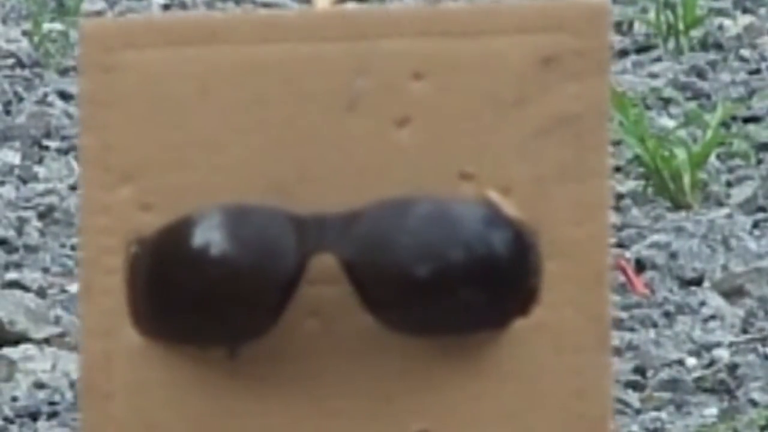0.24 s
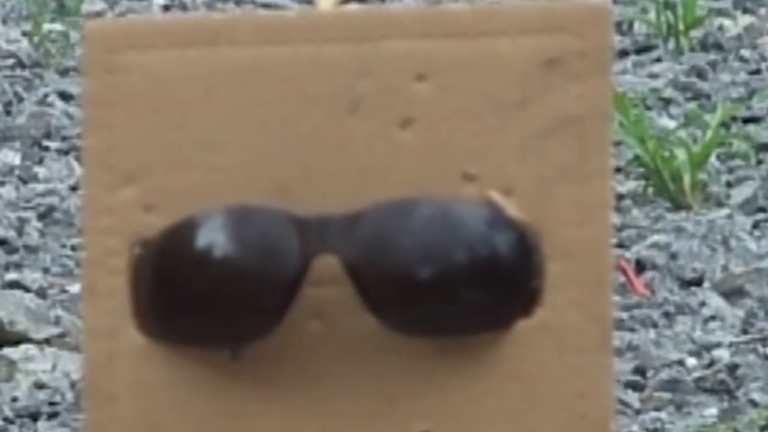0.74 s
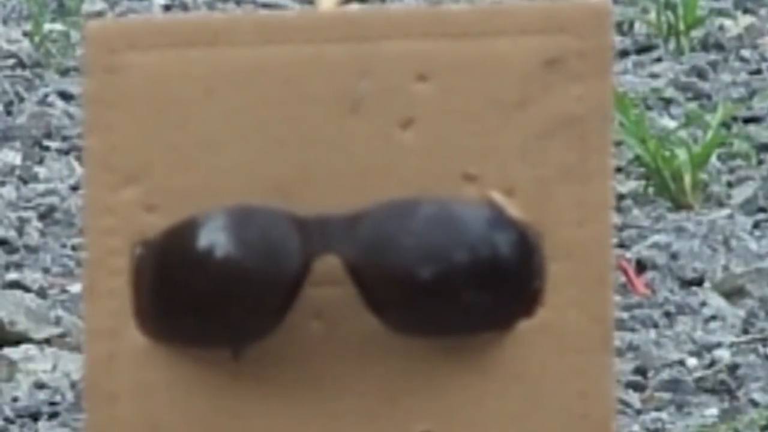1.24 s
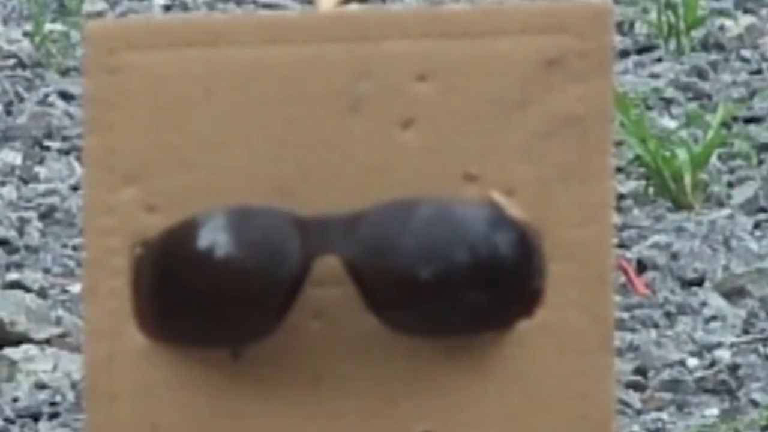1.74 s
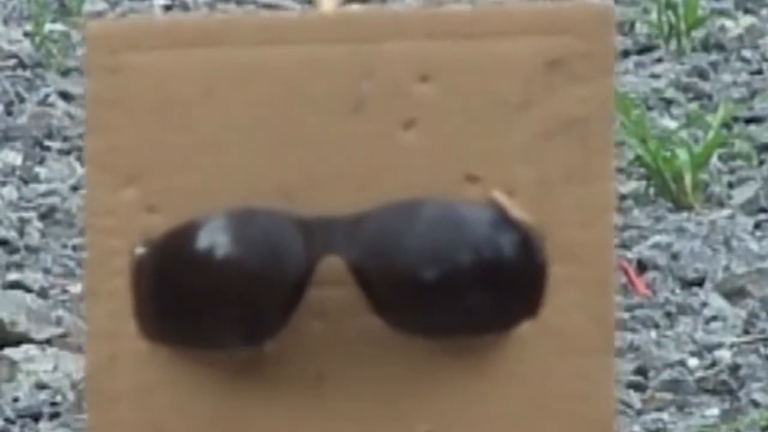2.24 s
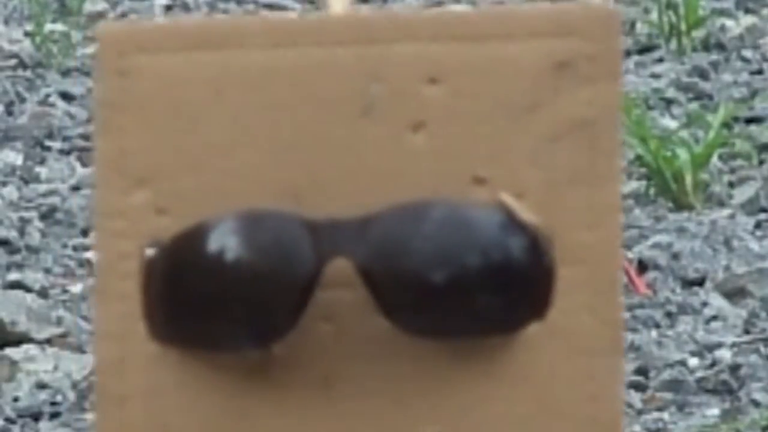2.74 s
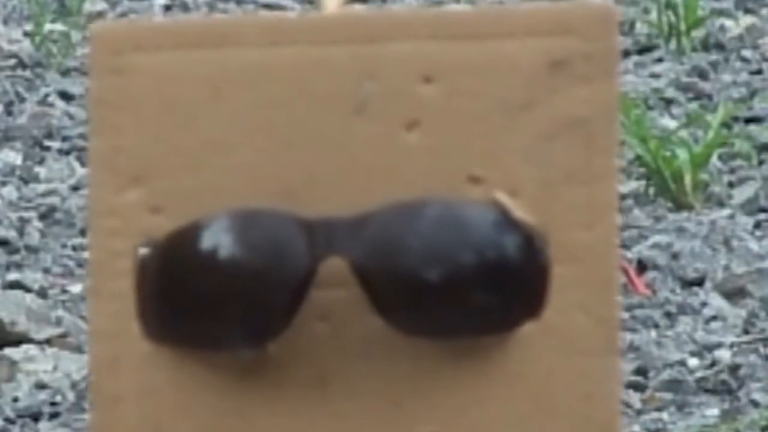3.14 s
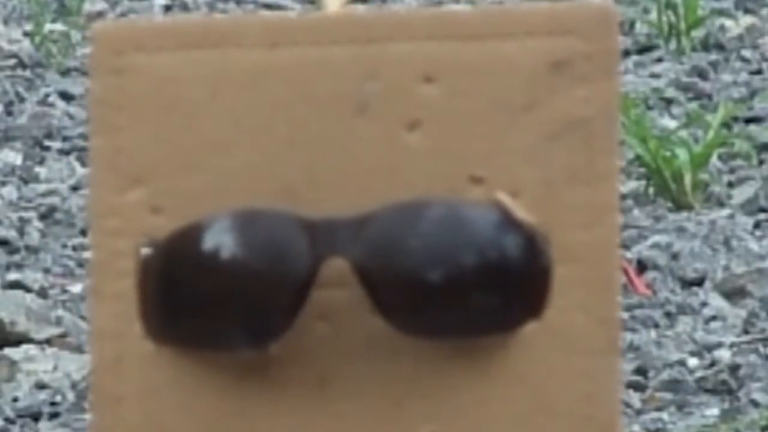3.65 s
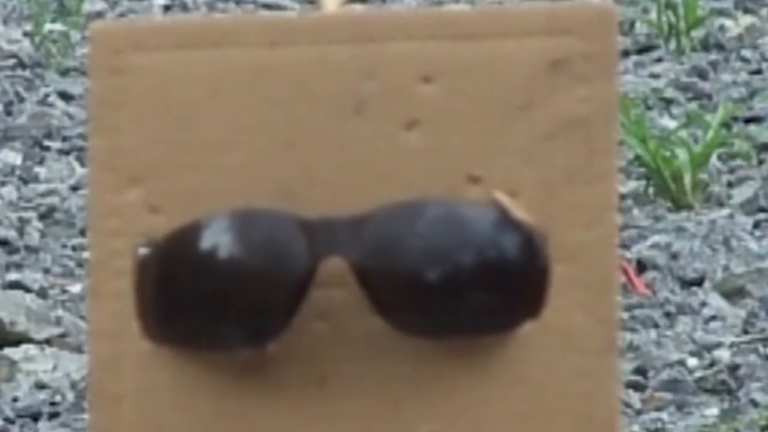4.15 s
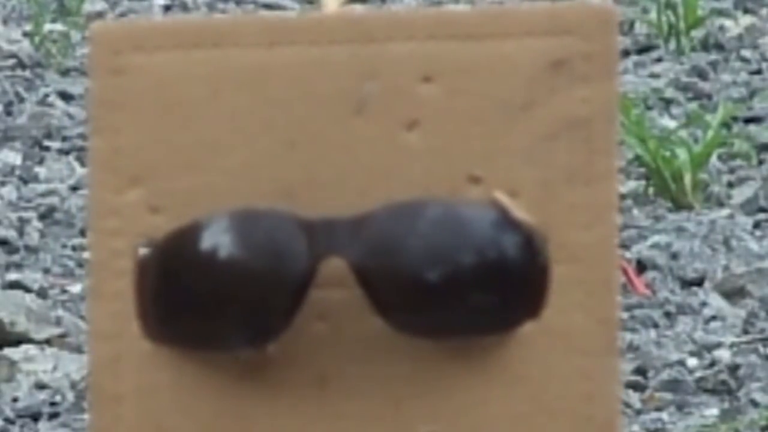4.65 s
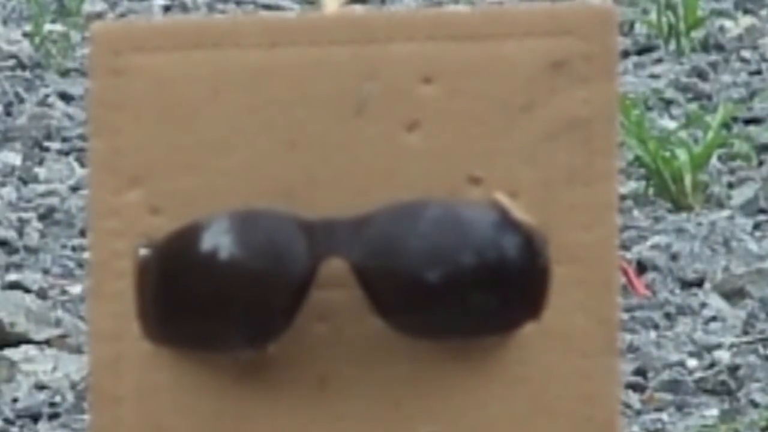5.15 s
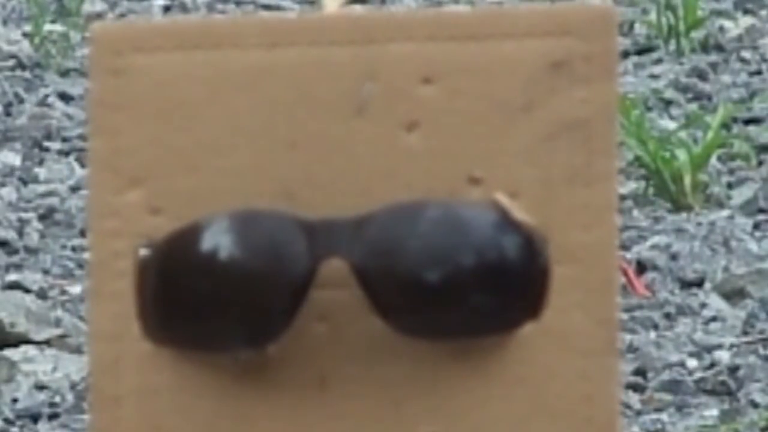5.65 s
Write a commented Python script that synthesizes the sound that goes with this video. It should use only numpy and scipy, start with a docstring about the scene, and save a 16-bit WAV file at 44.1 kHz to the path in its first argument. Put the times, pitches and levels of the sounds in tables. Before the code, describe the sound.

Close stereo microphones outdoors catch the tail of a gunshot, with gun metal clacking, then a quiet gap of airy hiss. A single small pistol fires with a snappy crack and a level, clumpy echo that drops away after more than half a second. Steel parts clack sharply several times, ringing briefly, before small ticks and one soft thud further off.

```python
"""A pistol shot cracks close to the microphones on an outdoor gravel range, over the dying echo of an earlier shot.
The blast is a short pressure wave with gas noise; a dense roll of filtered noise comes back from the surroundings.
Noise bursts and decaying modes make the gun's action clack; small ticks, a light tinkle and a thud further off
are shorter bursts and pulses. Steady stereo hiss lies under it all; everything passes three narrow notches in
the upper mids and a broad dip near 12 kHz."""
import sys
import numpy as np
from scipy import signal
from scipy.fft import rfft, irfft
from scipy.io import wavfile

SR = 44100
rng = np.random.default_rng(int(sys.argv[2]) if len(sys.argv) > 2 else 0)


def dump(signal):
    """Clip the signal to [-1, 1] and save it as 16-bit WAV at the path in sys.argv[1]."""
    limited = np.clip(np.atleast_2d(signal).T, -1, 1)
    pcm = np.round(limited * 32767).astype(np.int16)
    wavfile.write(sys.argv[1], SR, pcm)


N = 260190
TIME = np.arange(N) / SR  # seconds

# Colour of the hiss: (frequency [Hz], relative density [dB])
HISS_COLOUR = [(25, -53), (55, -19.5), (90, -6), (280, 0.5), (700, -0.5), (1400, -2), (2100, -6.5),
               (3000, -23.5), (5500, -16.5), (8000, -17.5), (11000, -23.5), (15000, -21.5)]
# Stereo width of the hiss: (frequency [Hz], side against mid [dB])
HISS_SIDE = [(40, -9.5), (300, 4.5), (1000, 3), (2000, -1.5), (15000, -1)]
# Stereo width of the other noise: (frequency [Hz], side against mid [dB])
ECHO_SIDE = [(60, -40), (400, -31), (1000, -14.5), (2000, -10), (6000, -6), (9000, -0.5), (15000, 4.5)]
# Rolling echoes of the earlier shot and of this one:
# (start [s], level [dB], treble level [dB], far tail level [dB])
ROLLING_ECHOES = [(-0.5, -18.5, -32.5, -34), (1.873, -19.5, -34, -34)]
# Colours of the roll's low, middle and treble parts: (frequency [Hz], relative density [dB])
ROLL_BASS_COLOUR = [(40, -47), (90, -34.5), (160, -26.5), (225, -4.5), (310, -8.5), (450, 1), (640, 2.5),
                    (900, -15), (1600, -56)]
ROLL_BODY_COLOUR = [(120, -51), (550, -9.5), (740, 2), (890, 0), (945, 4), (1010, 1.5), (1400, 0),
                    (2000, -6.5), (2600, -17.5), (5000, -35.5), (9000, -57)]
ROLL_TREBLE_COLOUR = [(1500, -25), (3500, -9.5), (6000, 2.5), (8000, -2.5), (10000, -9.5), (15500, -58)]
# Louder echoes swelling out of the roll: (time [s], length [s], lift [dB], lift of the bass [dB])
SWELLS = [(.028, 0.059, 3, -1), (1.865, 0.185, 3.5, 3), (2.099, 0.069, 3.8, 1.5), (2.189, 0.088, 3, 7),
          (2.389, .11, 2, 2.5)]
# Dull thud and its echoes: (time [s], level before filtering and scaling [dB])
THUD_PULSES = [(3.8179, -24), (3.8220, -24), (3.826, -20.5), (3.8315, -33), (3.8460, -33), (3.8595, -30)]
# Light double tinkle: (time [s], level [dB])
TINKLE_TOUCHES = [(.4985, -41), (.5500, -54)]
# Handling ticks: (time [s], level before the common trim [dB])
HANDLING_TICKS = [(0.8779, -46), (1.592, -41), (2.927, -39.5), (2.9783, -44), (3.782, -44), (4.4178, -42),
                  (4.9551, -45), (5.8124, -40), (5.8426, -43)]
# Clacks of the action, levels before the layer trims:
# (time [s], body level [dB], metal level [dB], sizzle level [dB], lead of the first contact [s])
ACTION_CLACKS = [(0.036, -14.5, -24.5, -29, 0.0014), (0.238, -23, -28.5, -25.5, 0.00085),
                 (2.5243, -11.5, -17.5, -23, 0.002), (2.6095, -12, -21, -38, 0.0015),
                 (3.1602, -10.5, -12.5, -22, 0.0034), (3.3014, -21, -24, -20.5, 0.0051),
                 (3.366, -35.5, -37, -36, 0.0039), (3.4175, -49, -40, -19.5, 0.0048)]
# Colours of the clack layers: (frequency [Hz], relative density [dB])
BODY_COLOUR = [(50, -39), (140, -40), (240, -2.5), (800, 2.5), (1800, 1), (2600, -14), (5000, -26),
               (10000, -33)]
METAL_COLOUR = [(1000, -4.5), (3500, -12.5), (5500, 6), (8000, 1.5), (10000, -5.5), (15000, -30)]
SIZZLE_COLOUR = [(5000, -19), (7000, -1), (8500, 4), (10000, -4), (13000, -9), (15500, -9)]
# Modes of the gun's hollow body and of its bright steel: (frequency [Hz], relative level [dB], t60 [s])
HOLLOW_MODES = [(441, -7, 0.87), (573, -7, 0.23), (600, -1.5, 0.38), (745, -6, 0.79), (982, -5.5, 0.63),
                (1260, -1, 0.29), (1294, 1, 0.27), (1494, -9, 0.49), (1720, -3, 0.31)]
BRIGHT_MODES = [(5500, -5, 0.16), (5880, -2, 0.17), (5960, -10, .16), (6570, -10, .12), (6800, -1, 0.15),
                (8000, -4, .13), (8490, -5, .13)]
# Hard snaps within the roll and the clacks: (time [s], level before filtering [dB], wave length [s])
HARD_SNAPS = [(2.2010, -7, .0014), (2.5242, 0, .0006), (2.6085, -5, .0008), (2.6355, -8, .0008)]
# The blast: (time [s], level before filtering [dB], wave length [s])
MUZZLE_BLAST = (1.8721, 2.2, .00085)
# Three narrow notches in the upper mids and a broad dip near 12 kHz: (centre [Hz], width of one pass [Hz])
SPECTRAL_DIPS = [(2770, 370), (3690, 490), (4610, 327), (11800, 5070)]

# A roll stays nearly level for the hold time, then falls; the far tail outlasts it.
HOLD_S, SAG_DB_PER_S, FALL_DB_PER_S, TAIL_DB_PER_S = 0.64, 1.25, 48.5, 19
# Air takes the treble over distance, more so once the roll falls.
TREBLE_LOSS_DB_PER_S, TREBLE_FALL_DB_PER_S = 5, 7
# The bass starts below the body, builds up and lingers.
BASS_DB, BASS_RISE_S, BASS_LINGER_DB_PER_S = -6, 0.017, 5.5
# The very top survives only in the first, nearest reflections.
FIZZ_DB, FIZZ_LOSS_DB_PER_S = -24, 50
SWELL_EDGE_S = 0.012


def undb(db):
    """Decibels to gain."""
    return 10 ** (np.asarray(db) / 20)


def gains(points):
    """Gain at every transform bin, from (frequency [Hz], level [dB]) points on a log frequency axis."""
    hz, db = np.transpose(points)
    bin_hz = np.arange(N // 2 + 1) * SR / N
    return undb(np.interp(np.log(bin_hz + 1), np.log(hz), db))


def noise(colour, width):
    """Coloured stereo noise: a mid of unit rms, plus and minus an independent side."""
    mid, side = irfft(rfft(rng.standard_normal((2, N))) * gains(colour), N)
    side = irfft(rfft(side) * gains(width), N)
    return np.array([mid + side, mid - side]) / mid.std()


def walk(rate_hz):
    """Smooth random wander with a spread near one."""
    steps = rng.standard_normal(N // 20)
    return np.interp(TIME * rate_hz, np.arange(len(steps)), steps)


def decay(start, t60):
    """Envelope that jumps to one and dies away by 60 dB in t60 seconds, down to a floor at -120 dB."""
    age = TIME - start
    return (age >= 0) * np.exp(-np.log(1000) * np.clip(age / t60, 0, 2))


def band(x, lo_hz, hi_hz, order=2):
    """Causal band-pass."""
    sections = signal.butter(order, [lo_hz, hi_hz], "band", fs=SR, output="sos")
    return signal.sosfilt(sections, x)


def shock(start, length):
    """A jump to overpressure that swings straight into suction."""
    age = np.maximum(TIME - start, 0) / length
    return (age > 0) * (age < 1) * (1 - 2 * age)


def hiss():
    """Steady outdoor air and microphone noise, wide and a little stronger on the right."""
    balance_db = np.array([[-0.45], [0.45]])  # left, right
    return undb(-44 + 0.33 * walk(5.3) + balance_db) * noise(HISS_COLOUR, HISS_SIDE)


def rumble():
    """Low noise from far away that dies slowly, from the earlier shot and from this one."""
    env = undb(-42) * decay(0, 4.9) + undb(-47.5) * decay(MUZZLE_BLAST[0], 10.6)
    colour = [(30, -19), (60, -7), (95, 3), (150, 4.5), (230, 10), (320, 4), (900, -37)]
    return env * noise(colour, ECHO_SIDE)


def swells():
    """Lift (dB) of the roll's body and treble, and of its bass, while a broad surface throws the blast back."""
    lifts = 0
    for start, length, lift_db, bass_lift_db in SWELLS:
        to_edge = np.minimum(TIME - start, start + length - TIME)
        gate = np.clip(to_edge / SWELL_EDGE_S + 0.5, 0, 1)
        lifts = lifts + np.outer([lift_db, bass_lift_db], gate)
    return lifts


def roll(start, level_db, treble_level_db, tail_db):
    """Countless reflections of a blast, as noise that comes in clumps and loses treble with distance."""
    age = np.maximum(TIME - start, 0)
    late = np.maximum(age - HOLD_S, 0)
    near = undb(level_db - SAG_DB_PER_S * age - FALL_DB_PER_S * late)
    far = undb(tail_db - TAIL_DB_PER_S * late)
    env = np.hypot(near, far)
    lift_db, bass_lift_db = swells()

    body = undb(lift_db) * noise(ROLL_BODY_COLOUR, ECHO_SIDE)

    bass_db = BASS_DB + bass_lift_db + BASS_LINGER_DB_PER_S * late
    build_up = 1 - np.exp(-age / BASS_RISE_S)
    bass = undb(bass_db + 0.58 * walk(40)) * build_up * noise(ROLL_BASS_COLOUR, ECHO_SIDE)

    air_loss_db = TREBLE_LOSS_DB_PER_S * age + TREBLE_FALL_DB_PER_S * late
    treble_db = treble_level_db - level_db + lift_db - air_loss_db
    treble = undb(treble_db) * noise(ROLL_TREBLE_COLOUR, ECHO_SIDE)

    fizz_colour = [(5000, -40), (10000, -4), (15000, 1)]
    fizz = undb(FIZZ_DB - FIZZ_LOSS_DB_PER_S * age) * noise(fizz_colour, ECHO_SIDE)

    clumps = undb(walk(60) + 0.2 * walk(250))
    return (TIME > start) * env * clumps * (bass + body + treble + fizz)


def thud():
    """Soft pressure pulses in quick succession further off, with a short dull tail."""
    pulses = band(sum(undb(db) * shock(s, 0.0013) for s, db in THUD_PULSES), 370, 1100)
    # the loudest table level sets the peak of the whole group
    pulses *= undb(max(db for _, db in THUD_PULSES)) / np.abs(pulses).max()
    colour = [(150, -41), (340, 2.5), (700, 3), (1300, -7), (3000, -44)]
    tail = noise(colour, ECHO_SIDE) * decay(THUD_PULSES[0][0], 0.35)
    return undb(-35) * tail - pulses


def tinkle():
    """A small piece of metal touches down twice: narrow bright noise that dies quickly."""
    env = sum(undb(db) * decay(s, 0.15) for s, db in TINKLE_TOUCHES)
    colour = [(4300, -33), (5000, 2), (5300, -2), (5900, -20), (9000, -15), (15000, -40)]
    return env * noise(colour, ECHO_SIDE)


def ticks():
    """Faint clicks of the gun being handled: a short noise burst with a weaker, longer tail."""
    env = sum(undb(db) * (decay(s, 0.0092) + undb(-10.5) * decay(s, 0.13)) for s, db in HANDLING_TICKS)
    colour = [(3000, -6), (6000, -3), (8000, 6), (11000, -7), (15000, -17)]
    return undb(-0.5) * env * noise(colour, ECHO_SIDE)


def strike(start, lead, t60):
    """Envelope of a light first contact, the full blow, and their scatter from nearby surfaces."""
    contacts = undb(-4) * decay(start - lead, 0.014) + undb(-2) * decay(start, 0.011)
    scatter = decay(start, t60) + undb(-12) * decay(start - lead, t60)
    return contacts + scatter


def ring(modes, blows, spread):
    """Each blow (s, dB) rings the modes for up to a second; phases differ by spread (rad) between microphones."""
    out, age = np.zeros((2, N)), TIME[:SR]
    for start, blow_db in blows:
        at = int(start * SR)
        for hz, mode_db, t60 in modes:
            phase = rng.uniform(0, 2 * np.pi) + spread * rng.standard_normal((2, 1))
            fade = np.exp(-np.log(1000) * age / t60)
            out[:, at:at + SR] += undb(blow_db + mode_db) * fade * np.sin(2 * np.pi * hz * age + phase)
    return out


def action():
    """Steel parts hit their stops: a hollow ringing body, a bright metal clash and a short sizzle."""
    body = sum(undb(db) * strike(s, lead, 0.34) for s, db, _, _, lead in ACTION_CLACKS)
    metal = sum(undb(db) * strike(s, lead, 0.17) for s, _, db, _, lead in ACTION_CLACKS)
    sizzle = sum(undb(db) * strike(s, lead, 0.17) for s, _, _, db, lead in ACTION_CLACKS)
    layers = [(body, BODY_COLOUR, -8), (metal, METAL_COLOUR, -7), (sizzle, SIZZLE_COLOUR, -7)]
    clash = sum(undb(trim_db) * env * noise(colour, ECHO_SIDE) for env, colour, trim_db in layers)
    clash = undb(0.44 * walk(500)) * clash  # fine grain

    hollow = ring(HOLLOW_MODES, [(s, db) for s, db, *_ in ACTION_CLACKS], spread=0.45)
    bright = ring(BRIGHT_MODES, [(s, db) for s, _, db, *_ in ACTION_CLACKS], spread=0.63)
    ringing = undb(-14.5) * hollow + undb(-20) * bright
    return band(clash + ringing, 205, 19000)  # keeps the grain's low spill out of the clacks


def snaps():
    """Single hard pressure waves, rounded off by distance."""
    return band(sum(undb(db) * shock(s, length) for s, db, length in HARD_SNAPS), 300, 3500)


def blast():
    """A steep pressure wave and its ground reflection, with a spit of gas and a low push."""
    start, level_db, length = MUZZLE_BLAST
    wave = 0.65 * shock(start, length) + shock(start + 0.0009, length)
    gas_colour = [(600, 2), (2000, -8), (6000, -4), (15000, -5)]
    gas = band(noise(gas_colour, ECHO_SIDE) * decay(start, 0.021), 600, 13000)
    push = undb(-18) * band(decay(start, 0.004), 35, 240, order=1)
    return undb(level_db) * band(wave, 150, 8000, order=1) + undb(-7) * gas + push


def scene():
    """Everything that reaches the two microphones, from the background to the shot."""
    echoes = rumble() + sum(roll(*row) for row in ROLLING_ECHOES)
    small_sounds = thud() + tinkle() + ticks() + action()
    return hiss() + echoes + small_sounds + snaps() + blast()


def record(dry):
    """Three narrow upper-mid notches and a broad dip near 12 kHz, clipping at full scale, a steep top cut."""
    for hz, width_hz in SPECTRAL_DIPS:
        dip = signal.iirnotch(hz, hz / width_hz, fs=SR)
        dry = signal.lfilter(*dip, signal.lfilter(*dip, dry))  # two passes
    clipped = np.clip(dry, -1, 1)
    top_cut = signal.ellip(10, 0.2, 70, 16100, fs=SR, output="sos")  # ripple dB, stop dB, edge Hz
    return signal.sosfilt(top_cut, clipped)


dry = scene()
out = record(dry)
dump(out)
```